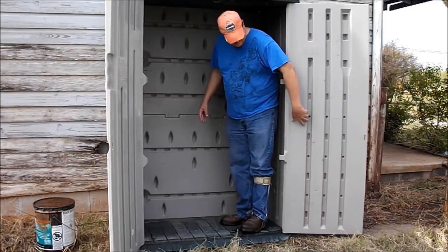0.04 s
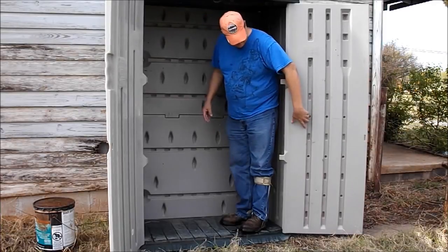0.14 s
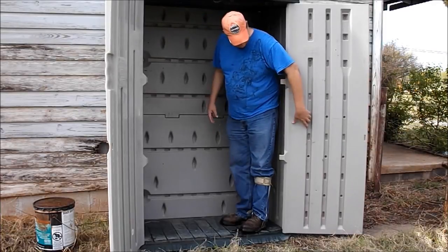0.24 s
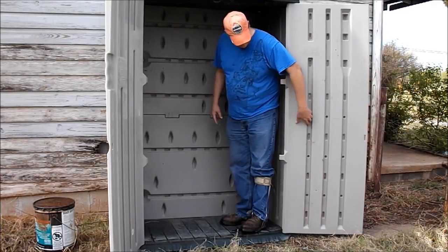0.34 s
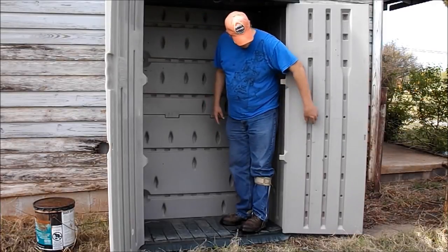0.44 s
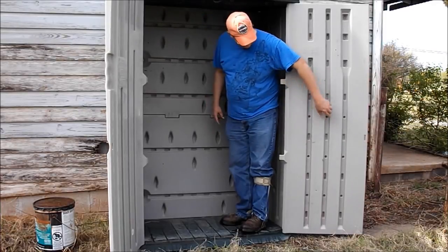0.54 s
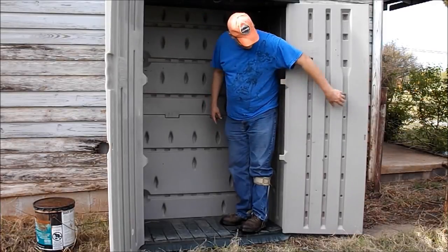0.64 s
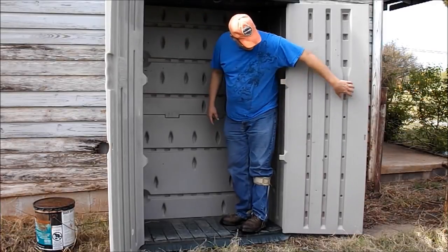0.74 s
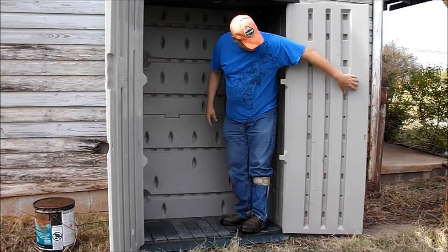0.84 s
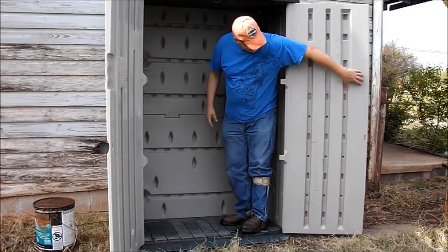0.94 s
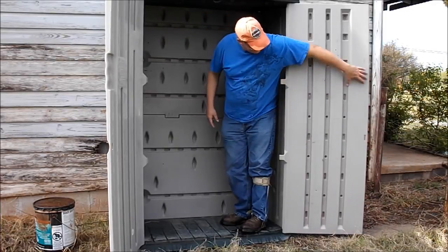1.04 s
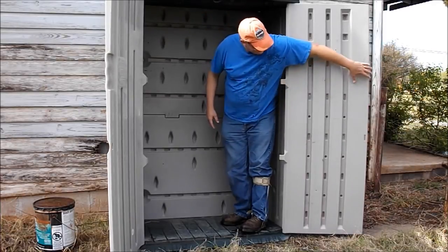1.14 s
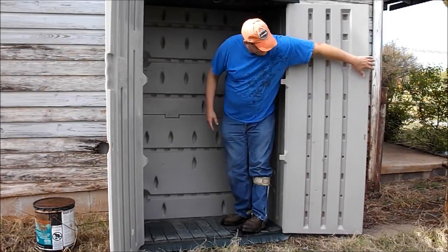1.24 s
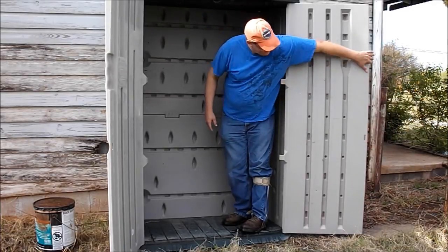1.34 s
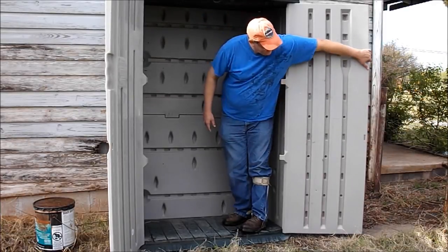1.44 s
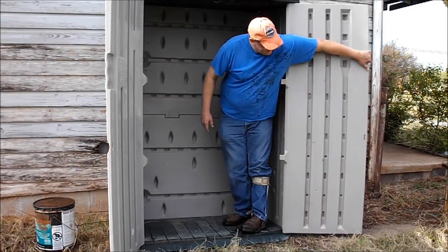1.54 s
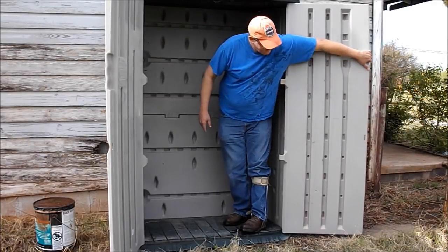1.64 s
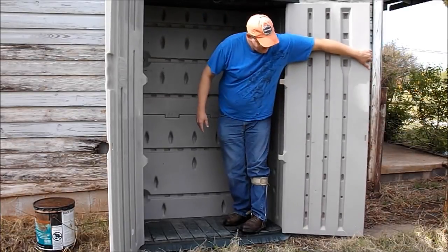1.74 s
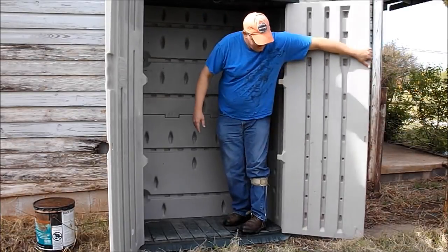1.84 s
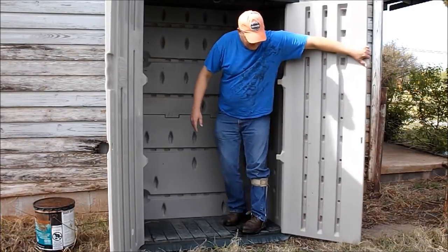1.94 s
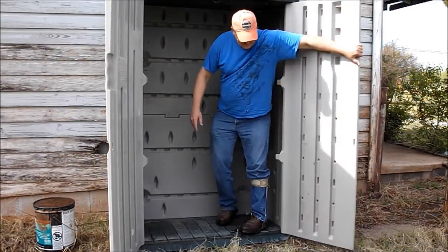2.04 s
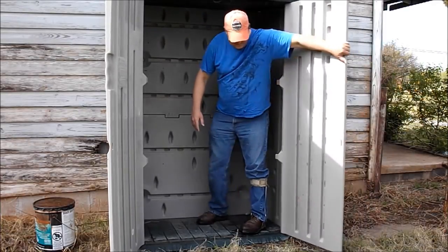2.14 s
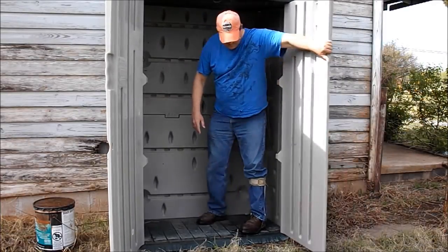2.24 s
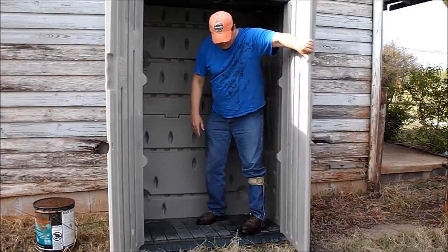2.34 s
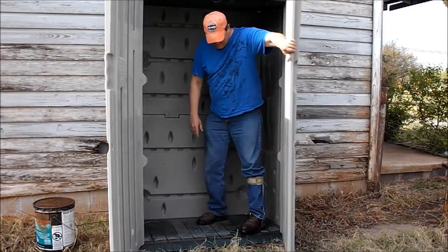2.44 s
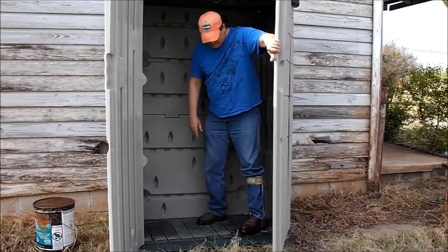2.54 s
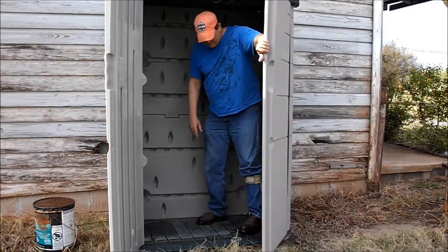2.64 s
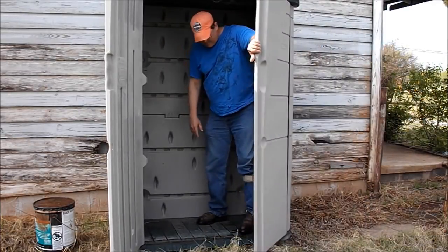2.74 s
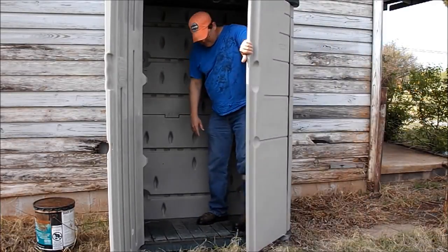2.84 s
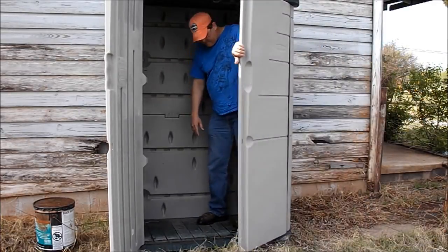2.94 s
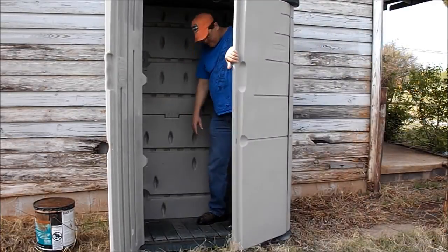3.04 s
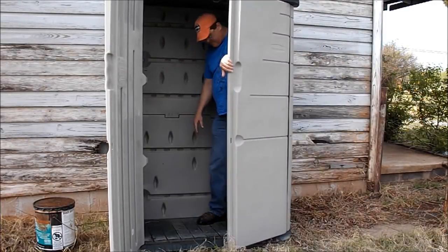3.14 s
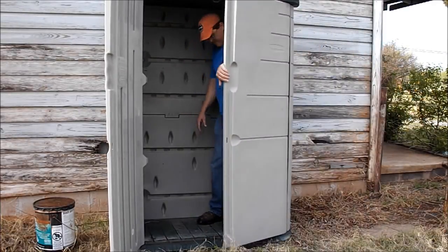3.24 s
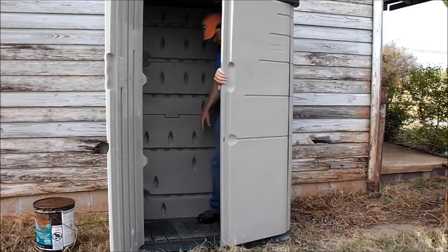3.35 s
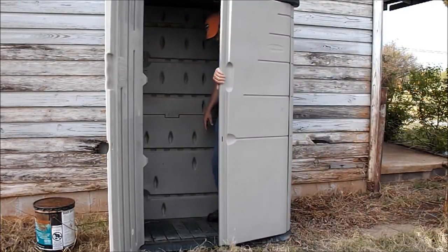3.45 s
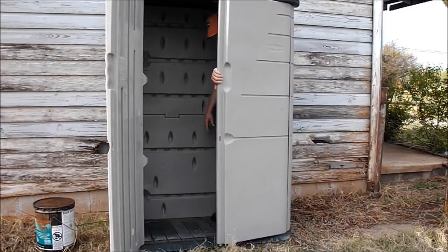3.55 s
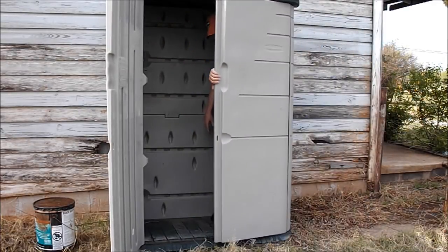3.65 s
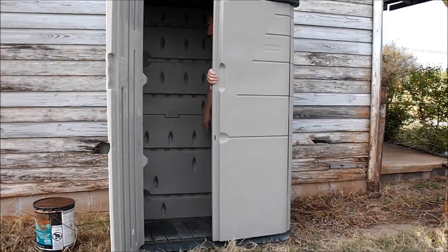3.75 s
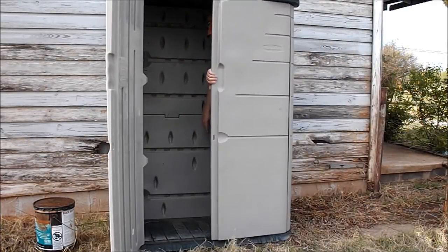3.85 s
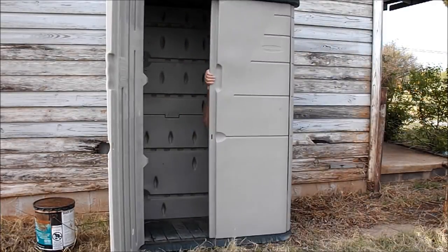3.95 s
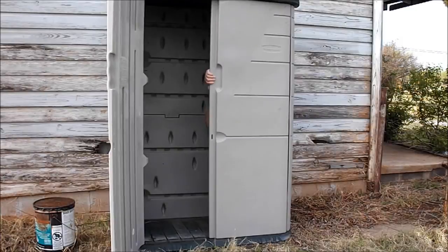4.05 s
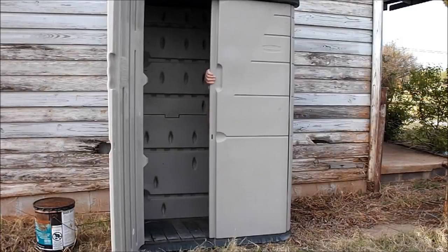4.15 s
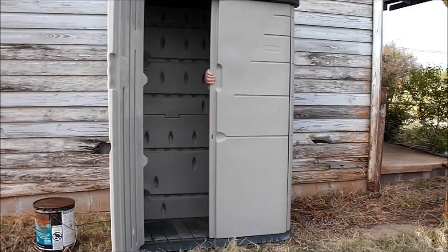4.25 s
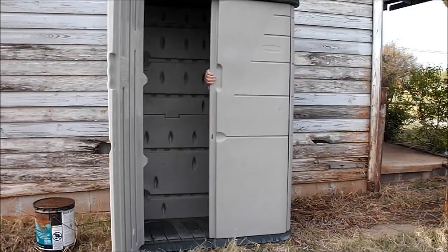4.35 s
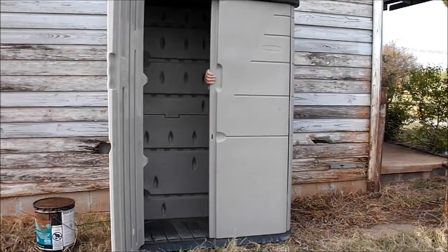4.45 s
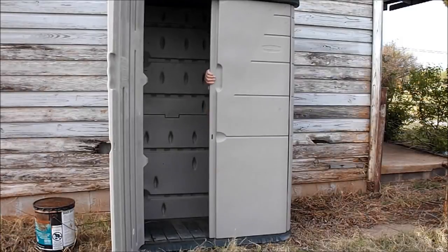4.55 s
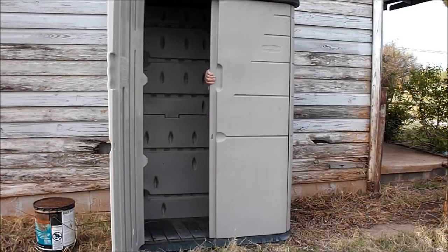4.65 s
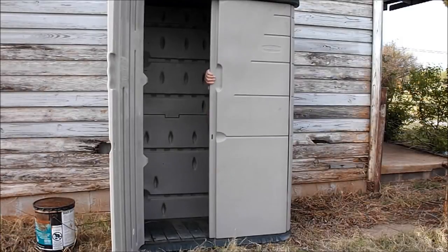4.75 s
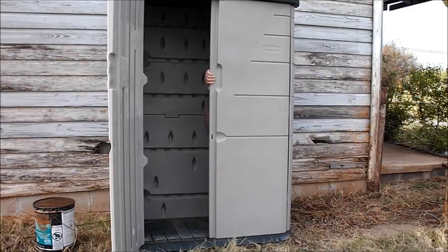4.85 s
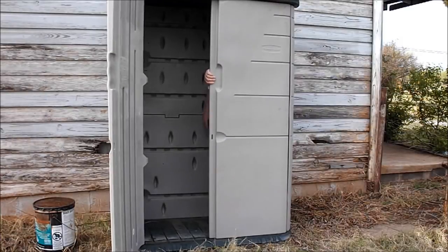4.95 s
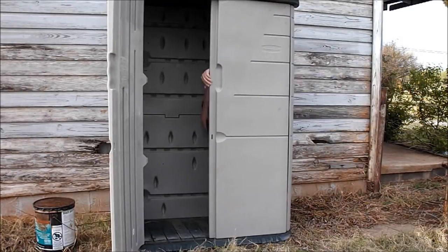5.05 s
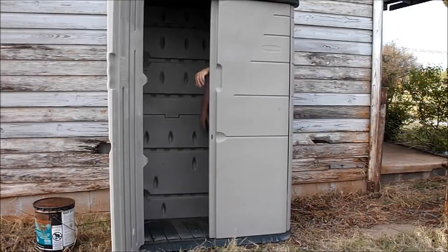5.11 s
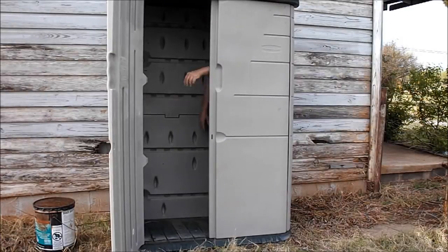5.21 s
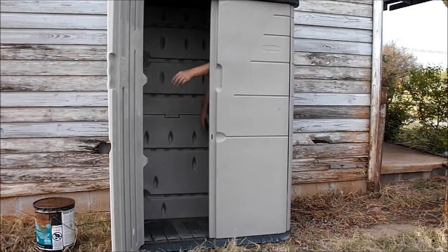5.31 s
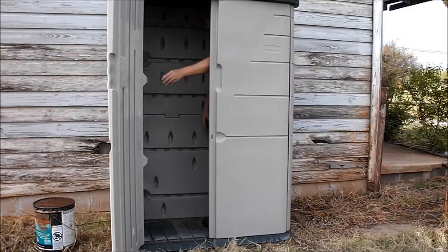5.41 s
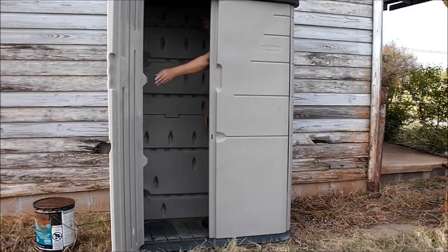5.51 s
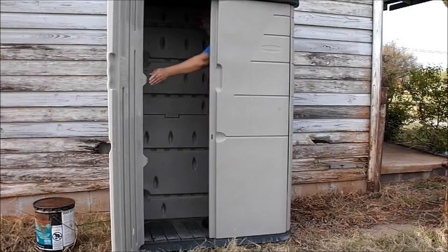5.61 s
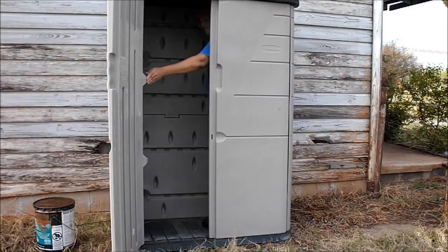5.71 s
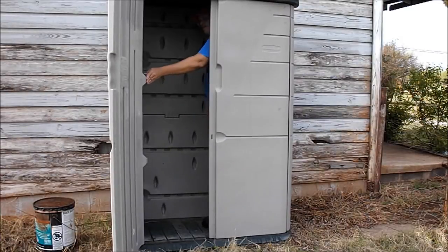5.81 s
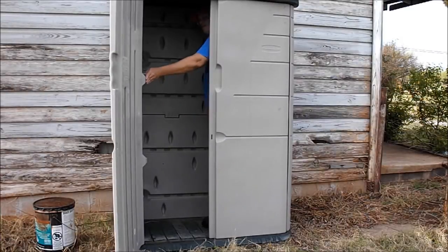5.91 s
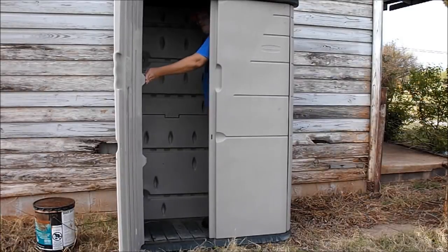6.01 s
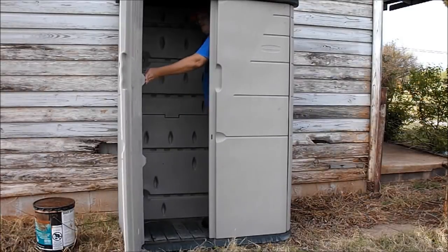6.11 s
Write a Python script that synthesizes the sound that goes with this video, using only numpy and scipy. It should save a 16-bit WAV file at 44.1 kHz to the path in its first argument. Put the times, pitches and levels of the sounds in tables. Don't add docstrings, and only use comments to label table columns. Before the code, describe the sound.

Open yard, picked up by a small camera nearby with steady hiss, thin high whine and faint periodic lens whirrs. Distant traffic rumble and leaf rustle start soft and gradually sink; a far flock chirps for the first two seconds. A tiny jolt at 0.5 s, then a hollow plastic knock with a click at 0.9 and a sharper ringing rap at 2.1. High twittering runs from 1.5 to 2.0. From 2.7 the door swings, brushing dry grass with a brief groan; at 3.4 it clicks and scours a tuft, then judders, scrapes and knocks increasingly until a loud, dull, boomy slam with bright ticks at 3.92, rebounding at 4.02. A faint low hum lingers and a hinge creaks softly until 4.8. Near birds whistle quick falling and rising slurs from 2.6 to the end. Muffled boot bumps and scuffs on the hollow floor come at 5.3 and 5.7.

```python
import sys
import numpy as np
from scipy import signal
from scipy.fft import rfft, irfft, next_fast_len
from scipy.io import wavfile
from scipy.ndimage import uniform_filter1d

SR = 44100
rng = np.random.default_rng(int(sys.argv[2]) if len(sys.argv) > 2 else 0)


def boost(x):
    u = np.asarray(x, float) / 20
    return 10 ** u


def store_pcm(level_fs):
    pcm = np.round(np.clip(level_fs, -1, 1) * 32767).astype(np.int16)
    wavfile.write(sys.argv[1], SR, np.atleast_2d(pcm).T)


N = 272342

# pitch_hz, density_db (per Hz)
HISS = [(3240, -11), (5500, -11.5), (8390, -9.5), (9090, -5), (9250, -7.5), (9880, -5), (10100, -4.5),
        (11200, 1), (12600, -9.5), (14800, -13), (15800, -1)]


def rms_one(x):
    return x / np.sqrt(np.mean(x ** 2) + 1e-20)


def lowpass(x, order, cutoff_hz):
    return signal.sosfilt(signal.butter(order, cutoff_hz, fs=SR, output="sos"), x)


def in_time(rows, fade=.004):
    s, *columns = np.transpose(rows)
    t = np.arange(N) / SR
    gate = np.clip(np.minimum(t - s[0], s[-1] - t) / fade + 1, 0, 1)
    return [np.interp(t, s, c) for c in columns] + [gate]


def drift(rate):
    r = np.exp(-80 * np.pi * rate / SR)
    slow = signal.lfilter([1], [1, -2 * r, r * r], rng.standard_normal(N // 40 + 2002))[2000:]
    return np.interp(np.arange(N) / 40, np.arange(len(slow)), rms_one(slow))


def ring(clicks, hz, t60):
    r, w = boost(-60 / (t60 * SR)), 2 * np.pi * hz / SR
    return signal.lfilter([0, np.sin(w)], [1, -2 * r * np.cos(w), r * r], clicks + 1e-18)


def coloured(spectrum, patchy_db):
    size = next_fast_len(N)
    hz = np.arange(size // 2 + 1) * SR / size + 1e-3
    points = np.array(spectrum)
    low_hz, high_hz = points[0, 0], min(points[-1, 0], 16000)
    shape = boost(np.interp(np.log(hz), np.log(points[:, 0]), points[:, 1], left=-90, right=-90))
    whole = rfft(rng.standard_normal(size)) * shape
    band = np.floor(2 * np.log2(hz / low_hz).clip(0))
    together = drift(1.4)
    out = np.zeros(N)
    for k in range(int(2 * np.log2(high_hz / low_hz)) + 1):
        flicker = boost(patchy_db * (2.05 * together + drift(18.0)))
        out += flicker * irfft(whole * (band == k), size)[:N]
    return rms_one(out)


def grains(per_s, spread_db):
    sizes = boost(spread_db * np.minimum(rng.exponential(1, N), 5)) * rng.choice([-1, 1], N)
    return sizes * (rng.random(N) < per_s / SR)


def swells(rows, depth_db, power):
    t, gain = np.arange(N) / SR, np.zeros(N)
    for start, peak, end, db in rows:
        on = slice(int(start * SR), int(max(peak, end) * SR) + 1)
        away = np.interp(t[on], [start, peak, end], [1, 0, 1])
        gain[on] += boost(db - depth_db * away ** np.clip(power, .5, 5)) * np.clip(8 * (1 - away), 0, 1)
    return gain


def glides(rows, peak, bend, in_db, out_db):
    share = np.linspace(0, 1, 9)
    swell = np.interp(share, [0, np.clip(peak, .1, .9), 1], [in_db, 0, out_db])
    return [np.transpose([s + length * share, hz + (to_hz - hz) * share ** bend, db + swell])
            for s, length, hz, to_hz, db in rows]


def wavering(rows, waver, rate, second_db):
    hz, level_db, gate = in_time(rows, fade=0.0062)
    phase = 2 * np.pi * np.cumsum(hz * (1 + waver * drift(rate))) / SR
    out, on = np.zeros(N), gate > 0
    tone = np.sin(phase[on]) + boost(second_db) * np.sin(2 * phase[on])
    out[on] = gate[on] * boost(level_db[on] + 1.0) * tone
    return out


def strikes(rows, modes):
    out, t = np.zeros(N + SR), np.arange(SR // 6) / SR
    for s, db, contact_s, tilt_db in rows:
        push = rng.standard_normal(len(t))
        push[0] = -3.5
        push = push * boost(-60 * t / max(contact_s, .001))
        sound = sum(boost(level_db + tilt_db * np.log2(hz / modes[0][0])) * ring(push, hz, t60)
                    for hz, level_db, t60 in modes)
        out[round(s * SR):][:len(t)] += boost(db) * sound / np.abs(sound).max()
    return out[:N]


def yard(x, t60):
    t = np.arange(SR // 2) / SR
    tail = signal.lfilter([.5], [1, -.5], rng.standard_normal(len(t))) * boost(-60 * t / t60) * (t > .006)
    return signal.fftconvolve(x, tail / np.sqrt(np.sum(tail ** 2)))[:N]


def outdoors():
    # time_s, level_db
    fade_rows = [(0, 0.5), (.77, -2), (1.62, -4.5), (2.11, -4), (2.6, -5), (3.35, -5.5), (4.25, -8.5),
                 (5.3, -7.5), (6.176, -10)]
    # pitch_hz, density_db (per Hz)
    rumble_spectrum = [(12, -35), (20, -1.5), (92, 1.5), (129, -2), (172, -0.5), (240, -7), (310, -21),
                       (530, -120)]
    # pitch_hz, density_db (per Hz)
    tyre_spectrum = [(140, -24), (240, -6.5), (353, 0), (476, -11), (529, -7.5), (611, -10), (741, -7),
                     (1080, -13), (1900, -38), (2400, -45), (3120, -74), (5280, -120)]
    # pitch_hz, density_db (per Hz)
    leaf_spectrum = [(1060, 3.5), (1800, 1.5), (1890, -2.5), (2100, -2), (3120, 5), (3620, -1),
                     (4420, -6.5), (6970, -17.5), (7560, -4.5), (8000, -14), (10400, -43), (17600, -120)]
    fade_db, _ = in_time(fade_rows)
    rumble = boost(-37 + 0.94 * fade_db) * coloured(rumble_spectrum, patchy_db=0.57)
    tyres = boost(-41 + 1.195 * fade_db) * coloured(tyre_spectrum, patchy_db=0.5)
    leaves = boost(-52.5 + 0.89 * fade_db) * coloured(leaf_spectrum, patchy_db=0.5)
    return rumble + tyres + leaves


def camera():
    # pitch_hz, level_db
    whine_tones = [(9453, -79), (9523, -67), (9561, -72), (9598, -69)]
    t = np.arange(N) / SR
    whine = sum(boost(db + 6.5) * np.sin(2 * np.pi * (hz * t + .02 * drift(5.8))) for hz, db in whine_tones)
    return boost(-56.5 + 2.5) * coloured(HISS, patchy_db=0.46) + whine


def capsule_hiss():
    own = coloured(HISS, patchy_db=1.0)
    return boost(-59) * np.array([own, own[::-1]])


def lens_motor():
    # start_s, peak_s, end_s, peak_db
    hunts = [(.12, .3, .5, -74), (1.12, 1.3, 1.46, -73), (2.15, 2.4, 2.65, -74), (3.14, 3.25, 3.38, -76),
             (4.13, 4.3, 4.5, -72), (5.15, 5.3, 5.47, -73), (6.12, 6.17, 6.3, -73)]
    # pitch_hz, level_db, t60_s
    housing = [(6130, 0, .01), (7400, 0, .01), (14400, -3, .004)]
    gears = rng.standard_normal(N)
    whirr = sum(boost(db) * rms_one(ring(gears, hz, t60)) for hz, db, t60 in housing)
    return swells(hunts, depth_db=-2, power=4.0) * boost(5) * whirr


def chorus():
    # start_s, peak_s, end_s, peak_db
    flurries = [(0, .08, 0.16, -55), (.18, .33, 0.54, -54.5), (.48, .56, .7, -60), (.72, .8, 1, -60),
                (1.25, 1.32, 1.5, -57), (1.5, 1.58, 1.68, -57), (1.66, 1.78, 2.02, -60),
                (1.92, 1.98, 2.2, -52)]
    # pitch_hz, level_db, t60_s
    chirp_bands = [(2750, -10, .012), (3000, -2, 0.017), (3200, 7, 0.025), (3420, -3, 0.014),
                   (3700, -9, 0.011)]
    air = rng.standard_normal(N)
    flock = sum(boost(db + 5.6 * drift(25)) * rms_one(ring(air, hz, t60)) for hz, db, t60 in chirp_bands)
    return swells(flurries, depth_db=7.0, power=1.8) * rms_one(flock)


def husky():
    # start_s, length_s, from_hz, to_hz, peak_db
    calls = [(1.69, 0.19, 3250, 3420, -51), (3.67, 0.048, 4140, 3920, -49), (4.85, .04, 3780, 3950, -51),
             (5.585, 0.078, 3820, 3950, -57)]
    notes = glides(calls, peak=0.5, bend=0.655, in_db=-16, out_db=-18)
    return sum(wavering(note, waver=0.0213, rate=62, second_db=-40) for note in notes)


def twitter_notes():
    # start_s, top_hz, level_db, length_s
    tops = [(1.474, 7500, -59, 0.035), (1.513, 8000, -53, 0.043), (1.552, 7700, -51, 0.045),
            (1.607, 8000, -52, 0.041), (1.655, 7500, -53.5, 0.036), (1.862, 7540, -57, 0.031),
            (1.9, 7960, -55, .026), (1.941, 7600, -54, 0.045), (1.997, 7900, -55, 0.017),
            (2.04, 7300, -55, .014)]
    return [[(s, 0.79 * hz, db - 9), (s + 0.218 * length, hz, db),
             (s + 0.49 * length, .95 * hz, db), (s + length, 0.85 * hz, db - 12)]
            for s, hz, db, length in tops]


def song_notes():
    # start_s, length_s, from_hz,
    # to_hz, peak_db
    slur_rows = [(6.065, 0.074, 4650, 3720, -48), (3.352, 0.052, 3650, 2710, -42.5),
                 (3.7, 0.068, 4040, 2420, -43), (3.986, 0.032, 3650, 2690, -38),
                 (4.256, 0.029, 4650, 2440, -41.5), (5.145, 0.038, 4040, 2530, -49.5),
                 (5.384, 0.025, 3850, 2640, -45.5), (5.42, 0.04, 3630, 2430, -43),
                 (1.37, 0.036, 4700, 2830, -54), (1.956, 0.055, 4150, 4060, -51),
                 (2.069, 0.027, 4100, 4040, -50.5), (1.994, .016, 3500, 2820, -50),
                 (2.035, 0.034, 4253, 2720, -46), (2.208, 0.062, 3300, 3330, -53),
                 (2.28, 0.058, 4400, 3910, -52.5), (2.382, 0.14, 2720, 2390, -61),
                 (2.48, 0.024, 4050, 2840, -53), (2.492, .045, 4140, 3550, -55),
                 (2.862, 0.017, 3270, 2820, -47.5), (2.887, 0.014, 3200, 2850, -49),
                 (4.49, 0.057, 2680, 2450, -53)]
    # start_s, length_s, from_hz, to_hz,
    # peak_db
    lead_rows = [(2.655, 0.11, 2756, 3340, -48.5), (2.718, 0.089, 3250, 3314, -50.5),
                 (3.31, 0.033, 2850, 3620, -52), (3.465, 0.076, 2750, 3440, -45.5),
                 (3.515, .045, 3380, 3630, -56), (3.955, 0.049, 3820, 3620, -52),
                 (4.165, 0.036, 3190, 3800, -53.5), (4.195, 0.035, 3800, 3710, -49.5),
                 (4.225, .03, 3700, 4670, -57), (4.625, .018, 3000, 3450, -58),
                 (4.642, .014, 3780, 3870, -53), (4.652, 0.02, 2950, 3140, -41.5),
                 (5.343, 0.027, 2430, 3120, -50), (5.37, 0.012, 3830, 3850, -52),
                 (5.635, 0.034, 2400, 3110, -51.5), (5.785, 0.021, 2740, 3200, -53),
                 (5.948, 0.025, 2500, 3050, -54),
                 (1.09, 0.165, 3200, 2920, -60), (2.462, 0.024, 4200, 4020, -56),
                 (4.099, 0.041, 3800, 3880, -61), (1.14, 0.16, 7480, 7800, -61),
                 (5.051, 0.033, 2390, 3300, -51), (5.618, .014, 2465, 3050, -60),
                 (5.926, 0.019, 2240, 2950, -60)]
    scoop_rows = [(4.72, 0.045, 3620, 2450, -38), (3.557, 0.043, 3710, 2580, -39.5),
                  (3.165, 0.034, 3610, 2670, -46), (3.194, 0.03, 2740, 2750, -45.5),
                  (4.29, 0.045, 3700, 2510, -40), (4.433, 0.051, 3450, 2750, -40),
                  (4.945, 0.027, 4300, 2680, -45), (5.205, 0.045, 3240, 2550, -44.5),
                  (5.235, 0.097, 2710, 2500, -56.5), (5.81, 0.093, 3990, 3480, -51)]
    slurs = glides(slur_rows, peak=0.77, bend=1.1, in_db=-15.5, out_db=-22)
    scoops = glides(scoop_rows, peak=0.45, bend=0.559, in_db=-12.5, out_db=-15)
    leads = glides(lead_rows, peak=0.38, bend=0.498, in_db=-6, out_db=-11)
    return slurs + scoops + leads


def birds():
    # time_s, pitch_hz, level_db
    warbles = [
        [(4.672, 3150, -62), (4.688, 3480, -59), (4.703, 3600, -55), (4.72, 3610, -51)],
        [(4.972, 3080, -60), (5.0, 3180, -57), (5.012, 3120, -47), (5.021, 3300, -56), (5.029, 3880, -52),
         (5.046, 3980, -49), (5.066, 3640, -48), (5.085, 3650, -47), (5.11, 3800, -55)],
    ]
    out, tremor = np.zeros(N), 1 + 0.004 * drift(71)
    for note in song_notes() + twitter_notes() + warbles:
        s, hz, level_db = np.transpose(note)
        at = np.arange(round((s[0] - .003) * SR), min(round((s[-1] + 0.00073) * SR), N))
        gate = np.clip(np.minimum(at - at[0], at[-1] - at) / (0.0028 * SR), 0, 1)
        pitch = uniform_filter1d(np.interp(at / SR, s, hz), size=120, mode="nearest") * tremor[at]
        level = boost(np.interp(at / SR, s, level_db) + 4.0)
        out[at] += gate * level * np.sin(2 * np.pi * np.cumsum(pitch) / SR)
    return out


def swish():
    # start_s, peak_s, end_s, peak_db
    brushes = [(2.70, 2.8, 2.94, -60), (2.84, 3.06, 3.37, -59), (3.62, 3.72, 3.73, -59.5),
               (3.74, 3.9, 3.94, -54.5), (4.925, 4.95, 4.97, -63), (5.29, 5.33, 5.2, -53),
               (5.69, 5.74, 5.76, -59)]
    # start_s, peak_s, end_s, peak_db
    scours = [
        (3.393, 3.4, 3.458, -41),
        (3.40, 3.44, 3.495, -37),
    ]
    # pitch_hz, density_db (per Hz)
    stalk_spectrum = [(880, -40), (1500, -1), (1590, -4.5), (2200, -12), (3050, -1), (4500, -2), (6190, -9),
                      (7760, -17), (10200, -8), (12800, -16), (15800, -20)]
    grit = 21 + uniform_filter1d(np.abs(grains(per_s=320, spread_db=7)), size=60) * 12
    stalks = rms_one(grit * coloured(stalk_spectrum, patchy_db=0.6))
    brushing = boost(6.5) * swells(brushes, depth_db=12.5, power=1.9)
    return (brushing + swells(scours, depth_db=15, power=1.7)) * stalks


def cavity():
    # time_s, pitch_hz, level_db
    hum = [
        [(3.3, 66.3, -48), (3.308, 67, -45), (3.45, 64.6, -42), (3.9, 65.4, -34), (3.92, 65.6, -20),
         (3.986, 65.2, -35), (4.004, 65.5, -20), (4.026, 64.6, -37), (4.12, 65.2, -25)],
        [(4.12, 65.3, -31), (4.128, 64.5, -40), (4.244, 65.2, -38), (4.256, 65.2, -33), (4.376, 65.2, -46),
         (4.392, 65.2, -38.5), (4.928, 65.4, -40.5), (4.936, 65.2, -49), (5.1, 65.3, -47)],
    ]
    hz, level_db, gate = in_time(hum[0] + hum[1][1:], fade=.06)
    turns = np.cumsum(hz + 1.0 * drift(6.4)) / SR
    return gate * boost(level_db + 3.0 + 1.5 * drift(16)) * np.sin(2 * np.pi * turns)


def creak():
    # start_s, peak_s, end_s, peak_db
    creeps = [(4.2, 4.26, 4.3, -46.5), (4.35, 4.42, 4.6, -48.5), (4.44, 4.62, 4.74, -44),
              (4.74, 4.81, 4.66, -48)]
    # time_s, pitch_hz, level_db
    groan = [(2.8, 754, -41), (2.836, 726, -50), (2.858, 644, -37), (2.9, 588, -48)]
    slips_per_s = 353
    steady = [(0, slips_per_s, 0), (N / SR, slips_per_s, 0)]
    slipping = wavering(steady, waver=0.0069, rate=24.0, second_db=-17)
    hinge = swells(creeps, depth_db=14.5, power=1.4) * slipping
    return hinge + wavering(groan, waver=0.032, rate=60.3, second_db=-22)


def judder():
    # start_s, length_s, from_hz, to_hz, peak_db
    burst_rows = [(3.555, 0.037, 294, 275, -28.5), (3.62, 0.038, 296.4, 330, -26.5),
                  (3.675, 0.074, 312.5, 308, -30.5), (3.755, 0.044, 306, 237, -27),
                  (3.81, 0.059, 255, 245, -28), (3.803, 0.029, 690, 683, -35.5),
                  (3.85, 0.078, 284, 338, -30)]
    bursts = glides(burst_rows, peak=0.61, bend=0.84, in_db=-6.5, out_db=-7)
    return sum(wavering(burst, waver=0.025, rate=29, second_db=-16.0) for burst in bursts)


def dense_modes(low_hz, high_hz, count):
    return np.geomspace(low_hz, high_hz, count) * boost(rng.normal(0, 0.23, count))


def drag():
    # start_s, peak_s, end_s, peak_db
    leaf_swells = [(2.78, 2.88, 3, -43), (2.9, 3.07, 3.3, -40), (3.1, 3.3, 3.56, -41),
                   (3.375, 3.395, 3.5, -39), (3.48, 3.5, 3.2, -34), (3.45, 3.91, 4.08, -26.5),
                   (3.95, 3.986, 4.015, -25), (4.0, 4.05, 4.12, -27), (5.28, 5.32, 4.6, -48),
                   (5.72, 5.745, 5.28, -44)]
    # start_s, peak_s, end_s, peak_db
    rasp_swells = [(2.72, 2.87, 2.94, -35.5), (3.395, 3.41, 3.56, -33), (3.5, 3.89, 3.915, -28.5),
                   (3.94, 3.965, 4, -49), (5.27, 5.37, 5.43, -43), (5.745, 5.78, 6.04, -44)]
    # pitch_hz, level_db, t60_s
    leaf_modes = [(227, -12, 0.077), (260, -5, 0.042), (287, 1, 0.05), (361, -2, 0.028)]
    slips = grains(per_s=900, spread_db=3.0)
    leaf = rms_one(sum(boost(db) * ring(slips, hz, t60) for hz, db, t60 in leaf_modes))
    panel_modes = dense_modes(368.0, 1783, count=16)
    panel = rms_one(sum(boost(-7 * np.log2(hz / 450)) * ring(slips, hz, 0.1) for hz in panel_modes))
    bending = swells(leaf_swells, depth_db=14.0, power=0.95) * leaf
    return bending + swells(rasp_swells, depth_db=23.5, power=0.58) * panel


def heels():
    # start_s, peak_db, contact_s, tilt_db (per octave)
    footfalls = [(5.299, -35, .04, -1), (5.316, -38, .03, -6), (5.349, -30, .04, 12), (5.365, -36, .05, -4),
                 (5.724, -40, 0.023, 2), (5.730, -27, 0.038, -16), (5.745, -29, 0.037, -1)]
    # pitch_hz, level_db, t60_s
    floor_modes = [(238, -21, 0.045), (343, 1.5, 0.087), (509, -1, 0.12), (656, 2, 0.07), (690, -14, .05),
                   (990, -22, .04), (1210, -23, 0.045), (1420, -17, 0.037)]
    return lowpass(strikes(footfalls, floor_modes), 4, 1800)


def taps():
    # start_s, peak_db, contact_s, tilt_db (per octave)
    touches = [(.8885, -14, 0.029, -10), (.897, -21, 0.024, -1), (2.0962, -17.5, 0.0051, 3),
               (2.0985, -14, .03, 2), (2.109, -21.5, 0.025, -15), (2.116, -21, 0.034, -4)]
    # pitch_hz, level_db, t60_s
    leaf_modes = [(393, -8, .05), (498, -7.5, 0.057), (670, -5, 0.081), (705, -2.5, 0.064),
                  (878, 6.5, 0.059), (1020, -10, 0.035), (1097, -12, 0.036), (1290, -13, 0.034),
                  (1355, -7, 0.048), (1570, -25, 0.05)]
    return lowpass(strikes(touches, leaf_modes), 4, 1800)


def contacts():
    # start_s, peak_db, centre_hz, hardness_db
    knuckle = [(.8892, -11, 870, -16)]
    raps = [(2.0977, -20, 820, -1.5), (2.846, -30, 670, -22), (3.3947, -21, 987, -18), (3.4, -29.5, 774, 1)]
    jolts = [(.487, -36, 610, -2), (.885, -26.5, 850, 4), (2.096, -35, 664, -26), (3.4945, -25.5, 433, -34),
             (3.567, -31, 296, -22), (3.64, -34, 660, -20), (3.735, -36, 930, -22), (3.793, -27, 723, -10),
             (3.815, -34, 720, -25), (3.866, -31, 760, -24), (3.893, -31, 910, -22), (3.903, -27, 635, -22),
             (4.02, -28.5, 683, -2.5), (4.94, -40, 340, -2)]
    rebounds = [(4.0235, -21.5, 620, -30), (4.032, -23, 325, -30)]
    steps = [(5.298, -37, 407, -40), (5.349, -31, 660, -42), (5.3515, -43, 1330, -30),
             (5.721, -32.5, 536, -32), (5.731, -39, 360, -31)]
    # rows, walls relative to panel (dB), panel ring (s), first push above the rattle, ring of the bay (dB)
    kinds = ((knuckle, -19, 0.09, 21.6, -42.5),
             (raps, -8, 0.14, 11.4, -28),
             (jolts, 1, 0.047, 1.8, -42.5),
             (rebounds, -4, 0.1, 4.9, -42.5),
             (steps, 1, 0.27, 4.2, -42.5))
    return sorted((s, db, db + boom_db, db + hard_db, hz, *rest)
                  for rows, boom_db, *rest in kinds for s, db, hz, hard_db in rows)


def knocks():
    # pitch_hz, level_db, t60_s
    wall_modes = [(66, -29.5, 0.08), (104, -4, 0.091), (140, 10, 0.12), (188, -20, 0.029), (245, 1.5, 0.16)]
    # pitch_hz, level_db, t60_s
    rib_modes = [(2950, 0, 0.01), (3800, 15, 0.0023), (4500, 8, 0.005), (5400, -25, 0.0027),
                 (5740, 3.5, 0.008), (8000, -23, 0.0017), (10800, -7, 0.0013)]
    out, t = np.zeros(N + SR), np.arange(SR // 4) / SR
    for s, body_db, boom_db, snap_db, centre_hz, ring_s, push, bay_db in contacts():
        noise = rng.standard_normal((3, len(t)))
        noise[:, 0] = [9, push, 4]
        to_walls, to_panel, to_ribs = [noise[k] * boost(-60 * t / max(share * ring_s, .002))
                                       for k, share in enumerate((.2, 1.05, .6))]
        walls = sum(boost(db) * ring(to_walls, hz, t60) for hz, db, t60 in wall_modes)
        band = signal.butter(2, [0.42 * centre_hz, 1.38 * centre_hz], "band", fs=SR, output="sos")
        panel = signal.sosfilt(band, to_panel)
        panel = panel + boost(bay_db) * ring(to_panel, centre_hz, 0.023)
        panel = lowpass(panel, 4, max(1350, 0.89 * centre_hz))
        ribs = sum(boost(db) * ring(to_ribs, hz, t60) for hz, db, t60 in rib_modes)
        for part, level_db in ((walls, boom_db), (panel, body_db), (ribs, snap_db)):
            out[round(s * SR):][:len(t)] += boost(level_db) * part / np.abs(part).max()
    return out[:N]


def ticks():
    # start_s, peak_db, rattle_s, tilt_db (per octave)
    tick_rows = [(.8853, -18, .01, -1), (2.0982, -28, 0.0044, 5), (2.103, -31, 0.12, 16),
                 (3.3975, -36, .003, 4), (3.403, -33, .004, 3), (3.4095, -31, .003, 0),
                 (3.418, -33, .004, 3), (3.441, -34, .006, 6), (3.9168, -12, 0.0054, 4.5),
                 (3.9208, -13, 0.024, -12), (3.9357, -17, 0.001, 3), (4.019, -40, .004, -2),
                 (4.0238, -38, .008, -10)]
    # pitch_hz, level_db, t60_s
    edge_modes = [(2950, 7, 0.0057), (4650, 3, 0.0063), (6080, -11, 0.01), (8550, -12.5, 0.0023),
                  (10200, -11, 0.0014)]
    return strikes(tick_rows, edge_modes)


def shut():
    # start_s, peak_db, contact_s
    blows = [(3.9147, -2.5, 0.0068), (3.9177, -3.5, 0.0054), (3.9203, 0, 0.0038), (3.9232, -1, 0.0028),
             (3.9271, -5.5, 0.0098), (3.9308, 1.5, 0.0067), (3.9340, 1.5, 0.0036), (3.94, -6.5, 0.0047),
             (3.949, -22, 0.0051)]
    # pitch_hz, level_db, t60_s
    held_modes = [(65, -20, 0.04), (128, -2.5, 0.049), (255, 2, 0.056), (308, -2, 0.055), (392, 2, 0.052),
                  (484, -7, 0.029), (592, -0.5, 0.041), (714, -5.5, 0.041), (935, -6.5, 0.034),
                  (1063, -25, 0.026), (1300, -44, 0.028)]
    thump = strikes([(*row, 0) for row in blows], held_modes)
    notch = signal.iirnotch(198, 3.0, fs=SR)
    return lowpass(signal.lfilter(*notch, thump), 4, 1400)


def scene():
    surroundings = outdoors() + camera() + chorus()
    song = birds() + husky()
    rubbing = swish() + cavity() + creak() + judder() + drag()
    door = knocks() + ticks() + shut()
    tails = boost(-17.0) * yard(door, t60=0.21) + boost(-13.5) * yard(song, t60=0.31)
    right = surroundings + song + rubbing + heels() + taps() + door + tails
    left = np.roll(right, 1)
    return np.array([left, right]) + lens_motor() + capsule_hiss()


def roll_off(x):
    return signal.sosfilt(signal.butter(12, 15910, fs=SR, output="sos"), x)


def record(dry):
    mid, side = (dry[0] + dry[1]) / 2, (dry[0] - dry[1]) / 2
    side = signal.sosfiltfilt(signal.butter(3, 300, "high", fs=SR, output="sos"), side)
    rounded = 0.92 * np.tanh(np.array([mid + side, mid - side]) / 0.96)
    top = signal.cheby2(10, 60, 16500, fs=SR, output="sos")
    return roll_off(signal.sosfilt(top, rounded))


dry = scene()
out = record(dry)
store_pcm(out)
```